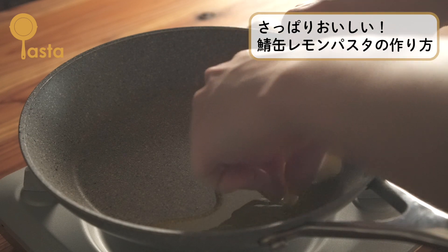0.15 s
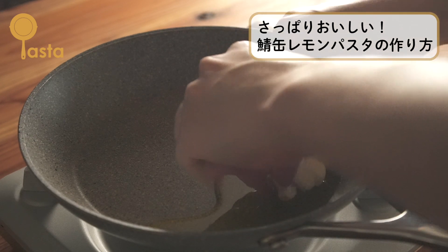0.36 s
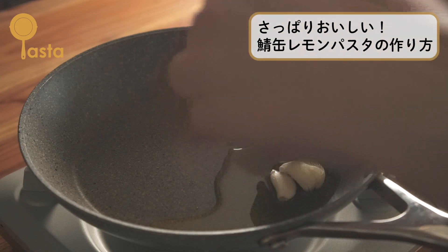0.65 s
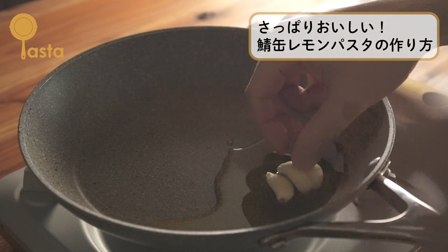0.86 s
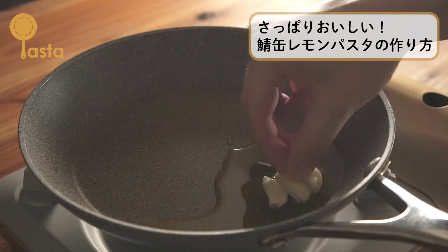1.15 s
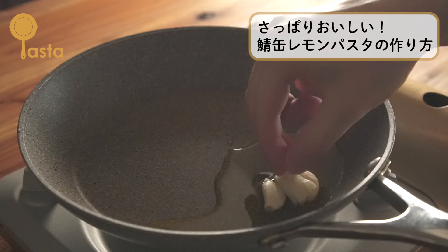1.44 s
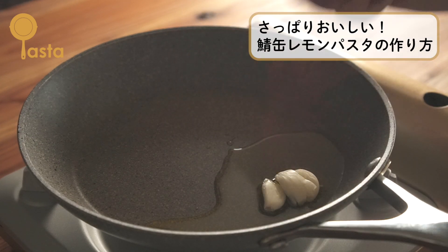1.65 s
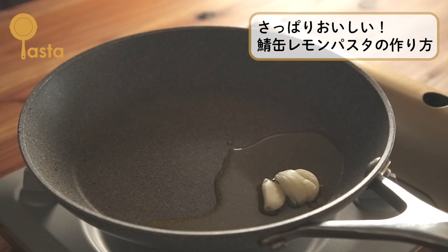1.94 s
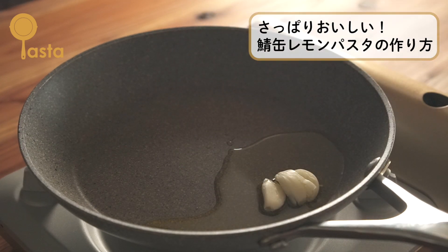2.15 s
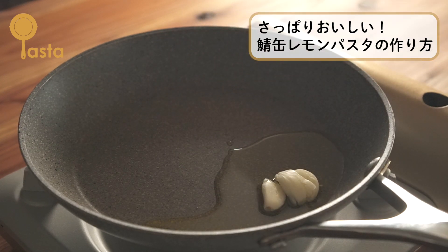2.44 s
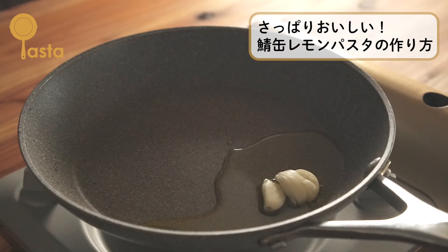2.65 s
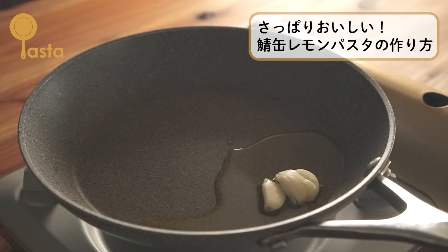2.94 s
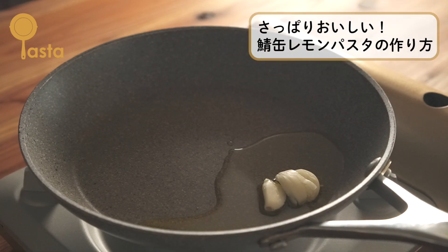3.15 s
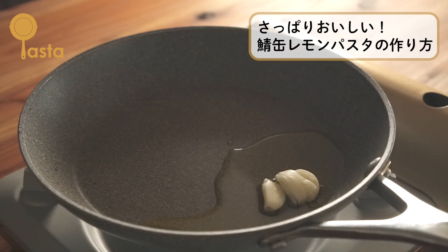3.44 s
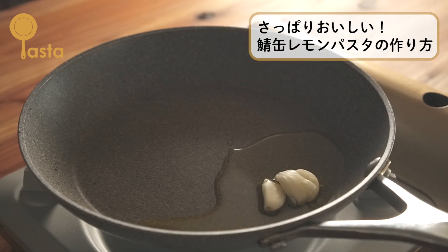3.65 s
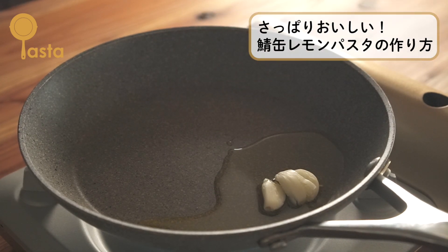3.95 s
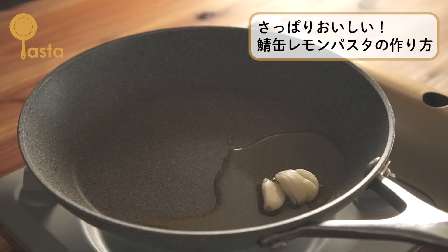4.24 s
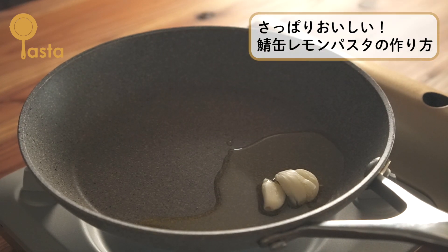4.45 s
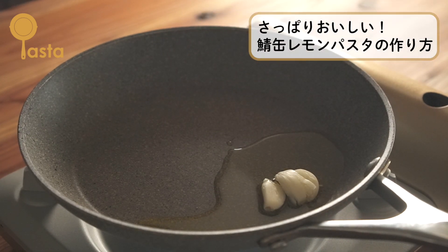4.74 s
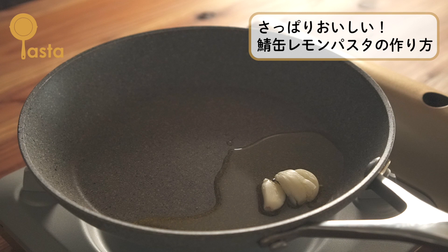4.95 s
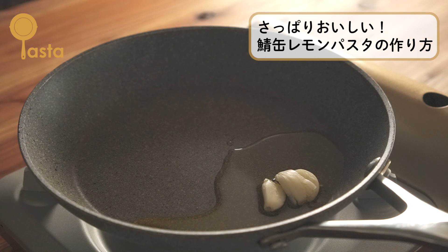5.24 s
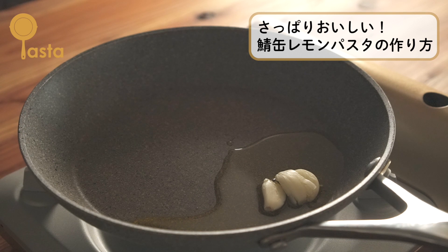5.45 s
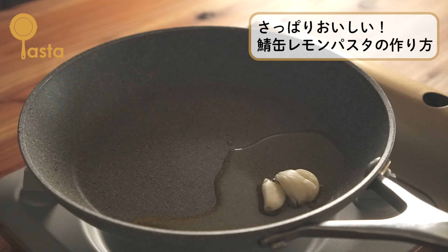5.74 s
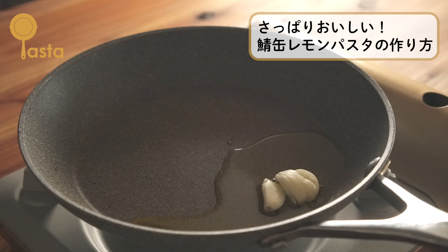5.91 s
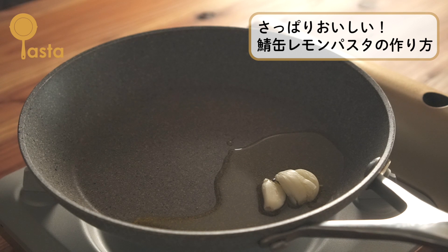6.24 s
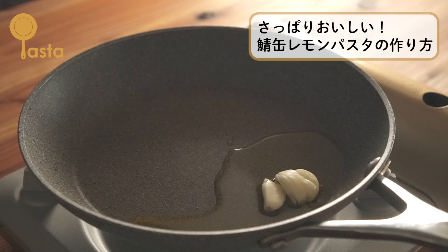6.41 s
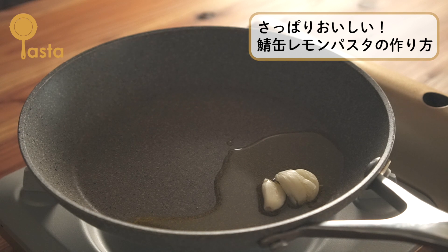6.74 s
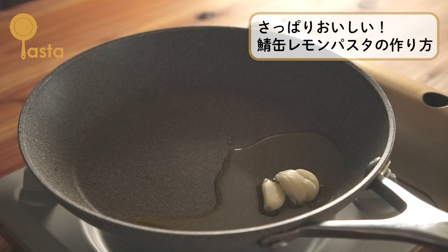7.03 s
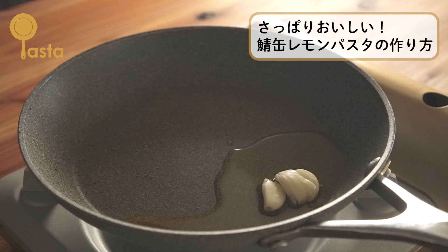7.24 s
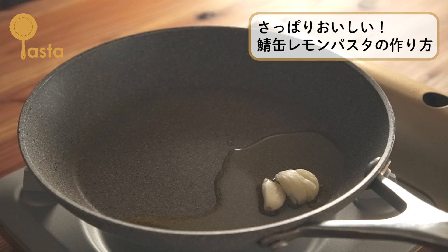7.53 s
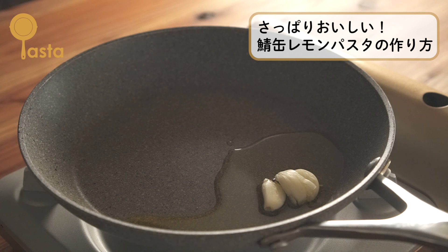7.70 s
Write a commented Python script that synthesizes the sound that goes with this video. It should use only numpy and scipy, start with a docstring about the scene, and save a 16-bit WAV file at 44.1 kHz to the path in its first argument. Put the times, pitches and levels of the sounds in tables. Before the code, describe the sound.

A quiet room hums softly, and a few very faint dry ticks of light bits landing in a frying pan come during the first two seconds. At about 2.5 seconds the knob of a nearby portable gas burner starts turning, with several short clunks that ring in its steel case. Gas spurts with a hiss at 2.8, and the igniter gives a sharp snap at 2.9, the loudest sound. The flame catches at once with a whoosh lasting half a second, amid a few smaller clicks. It roars and puffs under the pan, with another knob click at 3.8. From 4.4 to 5 seconds the flame is turned down, growing softer and duller. Two more metallic clicks follow around 5.3 and 5.4. The low flame then burns steadily, with a faint high whistling gas hiss, until the end at about 8 seconds.

```python
"""Lighting a gas burner

In a quiet room, fingers scatter light bits into a frying pan on a portable burner. The knob clunks
round, exciting the modes of the steel case; gas hisses through the resonant mixing tube and the
igniter snaps. The flame catches with a rush and its turbulence roars under the pan. It is turned
down and, after two more clicks, burns steadily."""
import sys
import numpy as np
from scipy import signal
from scipy.fft import rfft, irfft
from scipy.io import wavfile

SR = 44100
rng = np.random.default_rng(int(sys.argv[2]) if len(sys.argv) > 2 else 0)


def put_to_file(sound):
    """Save the sound as 16-bit audio at rate SR, in the file named by the first command-line argument."""
    columns = np.atleast_2d(sound).T  # one column per channel
    safe = np.clip(columns, -1, 1)
    whole_steps = np.round(safe * 32767)
    wavfile.write(sys.argv[1], SR, whole_steps.astype(np.int16))


N = 346966

# room air: spectrum (frequency [Hz], level [dB]); faint drones (frequency [Hz], width [Hz], lift [dB])
AIR_SPECTRUM = [(15, -6), (28, 4), (60, -2.5), (110, -2), (160, -8), (450, -16), (650, -13.5), (880, -19.5),
                (1400, -16.5), (1700, -22.5), (2050, -22.5), (3000, -32), (6000, -41.5), (15000, -47.5)]
AIR_DRONES = [(105.5, 10.7, 4.5), (186, 15, 4.5), (291.6, 7.4, 11.5), (372.6, 17, 7.5), (741, 25, 8.5)]
# reverberation time of the room (frequency [Hz], t60 [s])
ROOM_DECAY = [(200, 0.72), (1000, 0.3), (2200, 0.32), (6000, 0.4), (15000, 0.13)]
# light bits touching the pan (time [s], level [dB], pitch [Hz])
PAN_TICKS = [(.2319, -59, 4350), (.9727, -54, 7330), (.9944, -54, 6680), (1.0144, -53, 4190),
             (1.0544, -58, 7890), (1.229, -56, 5680), (1.299, -47.5, 4600), (1.3339, -56, 4280),
             (1.439, -51, 7340), (2.0594, -58, 7130)]
# faint rustles, brief hisses and dull bumps that swell and fade
# (time [s], length [s], level [dB], centre [Hz])
SOFT_SWELLS = [(.922, .23, -61.5, 8000), (1.75, .11, -63, 11000), (1.88, .24, -67, 8000),
               (2.414, .074, -62, 8000), (2.429, 0.065, -39.5, 970), (2.56, 0.15, -36, 50),
               (2.788, .11, -37.5, 126), (4.05, 0.081, -51.5, 4700), (5.236, 0.034, -43.5, 1570),
               (7.25, 0.71, -57, 5400), (7.5, 0.26, -45, 750)]
# blows in the knob and valve
# (time [s], crack [dB], case [dB], small parts [dB], favoured ring [Hz], base t60 [s])
KNOB_BLOWS = [(2.4895, -17, -17.5, -40, 2050, 0.11), (2.4973, -23, -16, -37, 1270, 0.15),
              (2.657, -13, -19, -26, 2750, 0.17), (2.757, -25, -26, -30, 1400, .18),
              (2.801, -15, -19, -34.5, 1830, 0.078), (2.81, -34, -19.5, -51, 715, .13),
              (2.9213, -2.5, -11.5, -16, 1520, 0.092), (2.926, -17, -19, -33, 2030, .1),
              (2.978, -16, -18, -24, 1900, 0.18), (3.081, -18, -20.5, -33.5, 2280, .14),
              (3.171, -25.5, -32, -50, 2700, 0.12), (3.361, -31, -29, -51, 990, 0.2),
              (3.8034, -22, -16.5, -50, 870, .12), (5.2668, -17.5, -19.5, -39, 1380, .14),
              (5.367, -37, -27.5, -47, 1400, .11), (5.3739, -24, -22, -35.5, 1120, 0.11),
              (5.39, -18, -20, -39, 2190, .16), (5.398, -21, -22.5, -44, 2250, 0.14)]
# modes of the steel case (frequency [Hz], level [dB], ring time [multiple of base t60])
STEEL_MODES = [(483, -11, 2.3), (711, -2.5, 1.1), (849, -3, 1.56), (972.4, 2, 1.26), (1047, -4.5, 1.1),
               (1168, -5.5, 1.3), (1377, 2.5, 0.72), (1574, -4.5, 1.1), (1766, -6, 0.81), (1886, -1, 1.38),
               (2022, -0.5, 0.96), (2200, -10, 1.4), (2340, -7, 1.3), (2540, -3.5, 0.81), (2750, -8, 0.94),
               (2974, -6, 1.2), (3460, -13, 0.98), (4050, -7.5, 0.74)]
# spectra of the struck case, small parts, hammer and spring (frequency [Hz], level [dB])
CASE_SPECTRUM = [(100, -32), (350, -18), (600, -13.5), (900, 3), (2100, -4), (3000, -12.5), (5000, -20.5),
                 (9000, -36), (16000, -56)]
PARTS_SPECTRUM = [(500, -54), (1500, -39), (2800, 4.5), (4300, 2.5), (5800, -1), (8300, 0), (10500, -13.5),
                  (14500, -6), (16500, -27)]
HAMMER_SPECTRUM = [(60, -5), (300, -5), (1000, 6), (2000, 5.5), (4000, -2.5), (8000, -7.5), (16000, -7.5)]
SPRING_SPECTRUM = [(300, -24), (800, -8), (1300, -2.5), (1650, 1.5), (2100, -2.5), (2800, -7), (4400, -7),
                   (6000, -13), (8700, -13), (10500, -23), (16000, -39)]
# resonances of the small parts, and those the spring excites (frequency [Hz], width [Hz], lift [dB])
PARTS_RESONANCES = [(2880, 170, -4), (3700, 150, 6), (4300, 240, 4.5), (7000, 200, 3), (7560, 300, 1.5)]
SPRING_RESONANCES = [(1104, 70, 10.5), (1580, 20, 6), (1780, 40, 7), (2020, 50, 17.5), (2700, 40, 14),
                     (3120, 60, 8), (3420, 70, 8), (4270, 200, 8), (7180, 70, 5)]
# spectra of the jet's rush and of the hiss around its whistle (frequency [Hz], level [dB])
RUSH_SPECTRUM = [(1000, -14), (2800, -1.5), (4000, -2), (5800, -7.5), (7300, -8), (8100, -1), (9200, -1.5),
                 (10000, -12), (13000, -16), (14300, -8), (16000, -9)]
HISS_SPECTRUM = [(1000, -14), (2700, -4), (3900, -14), (5600, -15), (7300, -13), (8600, -11), (10000, -24),
                 (13000, -18.5), (16000, -27)]
# resonances of the mixing tube, whistle and gap under the pan (frequency [Hz], width [Hz], lift [dB])
TUBE_RESONANCES = [(3270, 250, 12.5), (4120, 90, 5), (4910, 120, 10.5), (6190, 53, 13), (6610, 84, 11.5),
                   (6890, 55, 10.5), (7570, 80, 11), (9120, 270, 5), (14550, 210, 8)]
WHISTLE_RESONANCE = [(7990, 230, 18.5)]
GAP_RESONANCES = [(261.4, 19, 3.5), (365, 19, 1.5), (486, 25, 5), (584, 26, 6)]
# combustion spectra of the flare, the full flame and the low flame (frequency [Hz], level [dB])
FLARE_SPECTRUM = [(20, 7), (45, -0.5), (90, 2), (200, -0.5), (500, -9), (700, -6.5), (1000, -6),
                  (1400, -28), (2500, -25.5), (5000, -57), (12000, -57)]
FULL_FLAME_SPECTRUM = [(20, -20), (90, -19), (160, -1), (260, 1), (420, -1.5), (600, -7), (800, -21),
                       (1200, -28), (2200, -34), (8000, -70)]
LOW_FLAME_SPECTRUM = [(20, -15), (100, -3.5), (170, 0), (260, 0.5), (380, -2.5), (520, -12), (800, -22.5),
                      (1400, -25), (2200, -39), (8000, -59)]
# puffs of the young flame (peak time [s], length [s], lift [dB])
FLAME_PUFFS = [(3.142, .16, 4.5), (3.232, .05, 6), (3.348, 0.14, 6), (3.813, 0.23, 3), (3.97, 0.047, 7),
               (4.03, 0.078, 4.5)]

OPEN_S, SNAP_S = 2.755, 2.9214  # the valve opens; the igniter hammer falls
CATCH_S, CATCH_RISE_S = 2.94, 0.066
TURN_DOWN_S, TURNING_S = 4.4, .66


def amp(db):
    """Amplitude ratio of a level in decibels."""
    return 10 ** (np.asarray(db) / 20)


def unit(x):
    """Normalisation to rms 1."""
    return x / np.sqrt(np.mean(x ** 2) + 1e-20)


def read(points, hz):
    """Interpolation on a logarithmic frequency axis."""
    f, value = np.transpose(points)
    return np.interp(np.log(hz + 1), np.log(f + 1), value)


def add(mix, start, sound):
    """Superposition of a sound on the mix from start seconds on."""
    part = mix[max(round(start * SR), 0):][:len(sound)]
    part += sound[:len(part)]


def noise(spectrum, size, peaks=()):
    """Spectral shaping: noise of rms 1 with a smooth spectrum, lifted at resonances."""
    hz = np.fft.rfftfreq(size, 1 / SR)
    lifts = sum(lift / (1 + (2 * (hz - f) / width) ** 2) for f, width, lift in peaks)
    white = rfft(rng.standard_normal(size))
    return unit(irfft(white * amp(read(spectrum, hz) + lifts), size))


def flutter(rate_hz, depth_db):
    """Random amplitude modulation: a gain that wavers up to the given rate."""
    hz = np.fft.rfftfreq(N, 1 / SR)
    drift = irfft(rfft(rng.standard_normal(N)) / (1 + (hz / rate_hz) ** 4), N)
    return amp(depth_db * unit(drift))


def fade(t, t60):
    """Damping: exponential decay by 60 dB in t60."""
    return np.exp(-np.log(1000) * t / t60)


def ramp(start, length):
    """Linear rise from 0 to 1 over length seconds."""
    return np.clip((np.arange(N) / SR - start) / length, 0, 1)


def envelope(start, attack, hold, t60):
    """Linear attack, hold and exponential release, all in seconds."""
    since_release = np.maximum(np.arange(N) / SR - start - attack - hold, 0)
    return ramp(start, attack) * fade(since_release, t60)


def room_air(level_db=-39.5):
    """Ambient noise: a steady broad spectrum whose narrow peaks are heard as faint drones."""
    return amp(level_db) * noise(AIR_SPECTRUM, N, AIR_DRONES)


def reverberation(x, level_db=-11.5, delay_s=.007):
    """Diffuse reflections form a short tail in which each band decays at its own rate."""
    hz, t, bands = signal.stft(rng.standard_normal(SR // 2), SR, nperseg=256)
    tail = signal.istft(bands * fade(t, read(ROOM_DECAY, hz)[:, None]), SR)[1]
    tail = np.concatenate([np.zeros(round(delay_s * SR)), tail])
    return amp(level_db) * signal.oaconvolve(x, tail / np.linalg.norm(tail))[:N]


def soft_swells():
    """Windowed noise bands: faint rustles, brief hisses and dull bumps that swell and fade."""
    out = np.zeros(N)
    for start, length, db, hz in SOFT_SWELLS:
        window = np.hanning(round(length * SR))
        colour = [(hz / 4, -22), (hz, 0), (hz * 2, -9), (hz * 20, -70)]
        add(out, start, amp(db) * window * noise(colour, SR)[:len(window)])
    return out


def pan_ticks(t60=.1, spread=1.6):
    """Damped impacts: light bits touch the pan with faint dry ticks."""
    out, t = np.zeros(N), np.arange(SR // 5) / SR
    for start, db, hz in PAN_TICKS:
        colour = [(hz / spread ** 2, -18), (hz / spread, -3), (hz, 0), (hz * spread, -8)]
        add(out, start, amp(db) * noise(colour, len(t)) * fade(t, t60))
    return out


def knock(crack_db, case_db, parts_db, ring_hz, t60, favour_db=11, spread_octaves=0.28):
    """Impact excitation: a brief crack, then free vibration of the case and the small parts."""
    t = np.arange(SR // 2) / SR
    hz, db, ring_factor = np.transpose(STEEL_MODES)[:, :, None]
    # the place of the blow favours the modes near ring_hz
    weights = amp(db + favour_db / (1 + (np.log2(hz / ring_hz) / spread_octaves) ** 2))
    sines = np.sin(2 * np.pi * (hz * t + rng.random(hz.shape)))
    modes = (weights * fade(t, ring_factor * t60) * sines).sum(0)
    clear_modes = amp(case_db - 1.3) * modes / np.linalg.norm(weights)
    dense_modes = amp(case_db - 3.0) * noise(CASE_SPECTRUM, len(t), [(ring_hz, 0.22 * ring_hz, 6)])
    parts = amp(parts_db) * noise(PARTS_SPECTRUM, len(t), PARTS_RESONANCES)
    tail = clear_modes + dense_modes * fade(t, t60) + parts * fade(t, 0.88 * t60)
    case_crack = amp(case_db) * noise(CASE_SPECTRUM, len(t))
    parts_crack = amp(parts_db + 6.5) * noise(PARTS_SPECTRUM, len(t))
    crack = unit(case_crack + parts_crack) * fade(t, 0.014)
    return (amp(crack_db) * crack + tail) * (1 - fade(t, 0.00057))


def knob():
    """Structure-borne sound: the knob works latch, valve and hammer, and the case radiates the blows."""
    out = np.zeros(N)
    for start, *blow in KNOB_BLOWS:
        add(out, start, knock(*blow))
    return out


def igniter(snap_db=-0.5, chatter_db=-14, rebounds_per_s=1500):
    """Impact and rebound: the hammer snaps on the crystal; uneven bounces keep spring and case ringing."""
    t = np.arange(SR // 4) / SR
    rebounds = rng.choice([-1, 1], N) * (rng.random(N) < rebounds_per_s / SR)
    rattle = signal.oaconvolve(rebounds, noise(SPRING_SPECTRUM, len(t)) * fade(t, 0.007))[:N]
    ringing = noise(SPRING_SPECTRUM, N, SPRING_RESONANCES)
    chatter = amp(chatter_db) * envelope(SNAP_S, attack=0.0064, hold=0.056, t60=0.22)
    out = (.5 * unit(rattle) + 0.67 * ringing) * chatter
    snap = noise(HAMMER_SPECTRUM, len(t)) * fade(t, 0.022) * (1 - fade(t, 0.0018))
    add(out, SNAP_S, amp(snap_db) * snap)
    return out


def valve_setting():
    """Throttling of the flow: 1 at full gas, 0 at the low flame."""
    return 1 - ramp(TURN_DOWN_S, TURNING_S)


def jet(full_db=-53, low_db=-58.5, spurt_db=12, spurt_decay_s=0.18, whistle_db=-52.5):
    """Jet noise from the nozzle excites the mixing tube; a high whistle builds as the flow settles."""
    since_open = np.maximum(np.arange(N) / SR - OPEN_S, 0)
    spurt = spurt_db * np.exp(-since_open / spurt_decay_s)
    rush_gain = ramp(OPEN_S, length=.03) * amp(low_db + (full_db - low_db) * valve_setting() + spurt)
    whistle_gain = ramp(OPEN_S, length=1.8) * amp(whistle_db)
    whistle = noise(HISS_SPECTRUM, N, TUBE_RESONANCES + WHISTLE_RESONANCE)
    whistle *= flutter(rate_hz=22, depth_db=0.3)
    return rush_gain * noise(RUSH_SPECTRUM, N, TUBE_RESONANCES) + whistle_gain * whistle


def flare(burst_db=-24, sputter_db=-37.5):
    """Ignition transient: gathered gas burns off in a whoosh; a sputter stays while the flame is high."""
    burst = amp(burst_db) * envelope(CATCH_S, attack=0.099, hold=0.345, t60=0.18)
    sputter = amp(sputter_db) * ramp(CATCH_S, CATCH_RISE_S) * valve_setting()
    whoosh = unit(noise(FLARE_SPECTRUM, N) * flutter(rate_hz=50, depth_db=2.0))
    return np.hypot(burst, sputter) * whoosh  # the two add in power


def flame(full_db=-26, low_db=-36):
    """Turbulent combustion roars in the gap under the pan: puffing at first, softer and duller on low."""
    height = valve_setting()
    puffs = sum(db * np.sin(np.pi * ramp(peak - length / 2, length)) ** 2
                for peak, length, db in FLAME_PUFFS)
    gain = ramp(CATCH_S, CATCH_RISE_S) * amp(low_db + (full_db - low_db) * height + puffs)
    full = noise(FULL_FLAME_SPECTRUM, N, GAP_RESONANCES) * flutter(rate_hz=31, depth_db=1.5)
    low = noise(LOW_FLAME_SPECTRUM, N, GAP_RESONANCES) * flutter(rate_hz=25, depth_db=1.5)
    return gain * (np.sqrt(height) * unit(full) + np.sqrt(1 - height) * unit(low))


def scene():
    """Superposition of the nearby stove and the room air; only the brief sounds reverberate."""
    brief = knob() + igniter() + pan_ticks() + soft_swells()
    return (room_air() + brief + reverberation(brief) + flame() + flare() + jet())[None]


def record(dry, cutoff_hz=15850):
    """Overload and band limiting: the snap just clips at full scale, then a low-pass filter acts."""
    lowpass = signal.firwin(511, cutoff_hz, window=("kaiser", 8), fs=SR)
    return signal.oaconvolve(np.clip(dry, -1, 1), lowpass[None], "same")


dry = scene()
out = record(dry)
put_to_file(out)
```